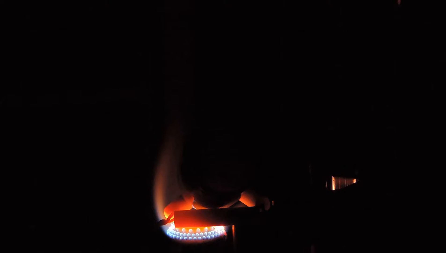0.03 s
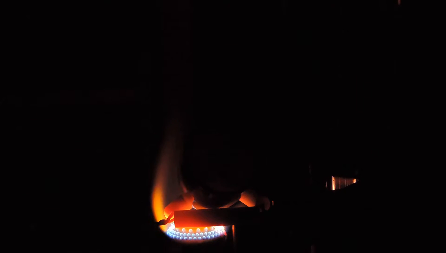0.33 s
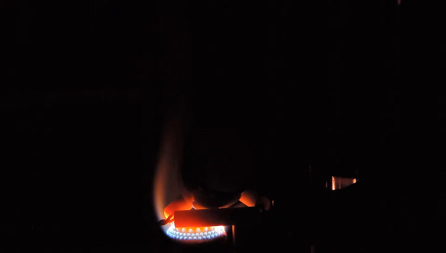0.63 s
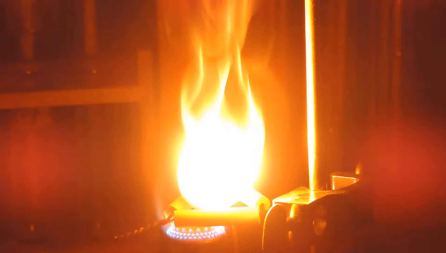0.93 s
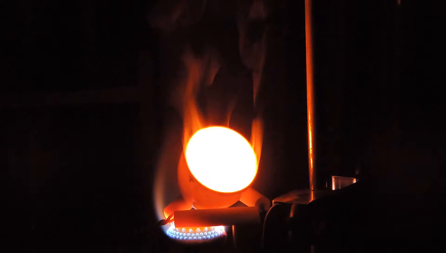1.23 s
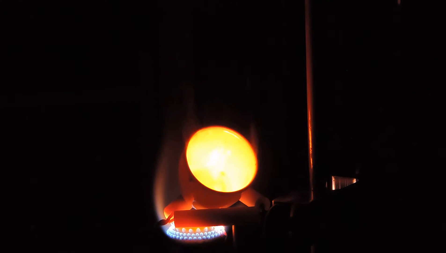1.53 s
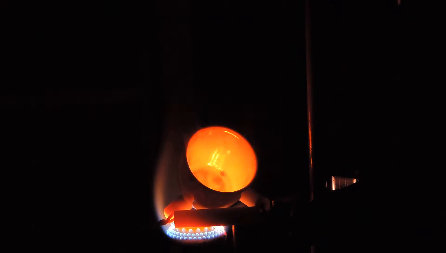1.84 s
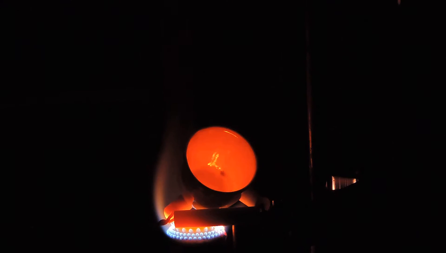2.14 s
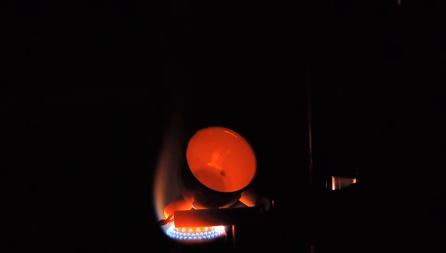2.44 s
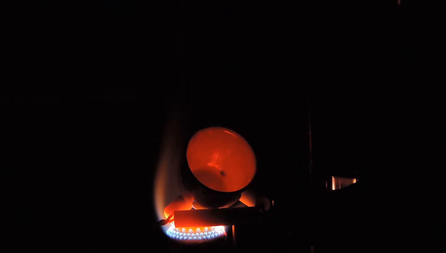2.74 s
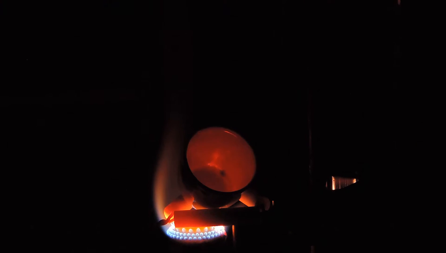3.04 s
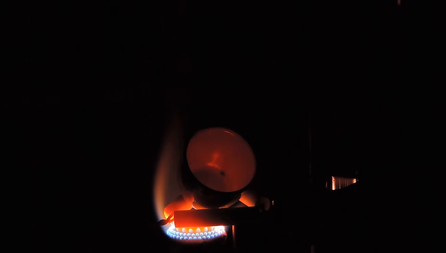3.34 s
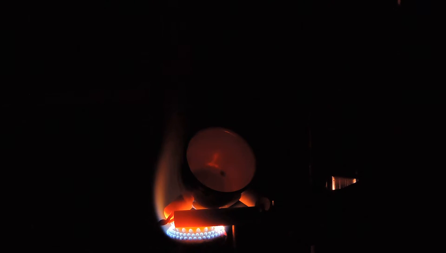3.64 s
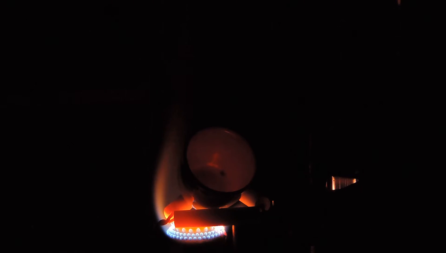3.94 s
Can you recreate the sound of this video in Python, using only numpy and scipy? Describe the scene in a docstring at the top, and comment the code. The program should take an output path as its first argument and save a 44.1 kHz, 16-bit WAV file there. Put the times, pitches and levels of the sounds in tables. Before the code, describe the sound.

A brief fiery flare hisses and crackles about a second in, cutting through the low roar of a gas burner in a fairly dead room. The microphone level ducks, then recovers, and the flame flutters on.

```python
"""Thermite flaring over a gas burner

A gas burner roars under a small crucible in a room, its flame fluttering and guttering over a hiss.
The thermite catches and flares for a third of a second: a bright jet of gas, full of crackle and a few
sharp spits, rings the crucible. A limiter ducks under the flare, holds, and lets the burner swell back."""
import sys
import numpy as np
from scipy import signal
from scipy.fft import rfft, irfft
from scipy.io import wavfile
from scipy.ndimage import uniform_filter1d, minimum_filter1d

SR = 44100
rng = np.random.default_rng(int(sys.argv[2]) if len(sys.argv) > 2 else 0)


def file_out(sig):
    """Save sig as 16-bit WAV at sys.argv[1]."""
    # one column per channel
    cols = np.atleast_2d(sig).T
    # limit, then scale
    lim = np.clip(cols, -1, 1)
    pcm = np.round(lim * 32767).astype(np.int16)
    wavfile.write(sys.argv[1], SR, pcm)


N = 176400
T = np.arange(N) / SR
HZ = np.maximum(np.arange(N // 2 + 1) * SR / N, 1)


def from_db(db):
    """Decibels to gain."""
    return 10 ** (np.asarray(db) / 20)


def eq_curve(points):
    """Gains that give unit white noise a spectrum of (frequency [Hz], density [dB/Hz]) points."""
    hz, db = np.transpose(points)
    return from_db(np.interp(np.log(HZ), np.log(hz), db)) * np.sqrt(SR / 2)


def bell(hz, width):
    """Gain of a resonance, 1 at its centre."""
    return 1 / (1 + 2 * ((HZ - hz) / width) ** 2)


def equalise(x, gain):
    """Minimum-phase EQ: rings after a transient, never before."""
    cepstrum = irfft(np.log(gain), N)
    cepstrum[1:N // 2] *= 2
    cepstrum[N // 2 + 1:] = 0
    return irfft(rfft(x) * np.exp(rfft(cepstrum)), N)


def noise(gain):
    """White noise shaped by a gain at each frequency."""
    return irfft(rfft(rng.standard_normal(N)) * gain, N)


def butterworth(x, hz, kind, order=2):
    """Low- or high-pass filter."""
    return signal.sosfilt(signal.butter(order, hz, kind, fs=SR, output="sos"), x)


def crossover(x, hz):
    """Low and high bands that add up to the whole."""
    low = irfft(rfft(x) / (1 + (HZ / hz) ** 6), N)
    return low, x - low


def stereo(mid, side):
    """Left and right: mid is shared, side is opposite in the two ears."""
    return np.array([mid + side, mid - side])


# Broad body of the roar, mid channel: (frequency [Hz], level [dB])
ROAR_MID = [(20, -80.5), (60, -85.5), (95, -87), (165, -80), (400, -84), (700, -86.5), (930, -87),
            (1300, -93.5), (1800, -92.5), (2400, -97.5), (3200, -106), (6000, -120)]
# Diffuse part of the roar, side channel: (frequency [Hz], level [dB])
ROAR_DIFFUSE = [(20, -89), (250, -94), (450, -88), (700, -101), (900, -95), (1350, -94.5), (1750, -93),
                (2500, -99), (3300, -106), (6000, -120)]
# Resonances of burner and room: (centre [Hz], width [Hz], mid level [dB], side level [dB])
BURNER_MODES = [(113, 8.5, -85, -104), (206, 40, -76.5, -100), (258, 32, -72, -99),
                (289.9, 23.2, -66, -102), (357, 25, -81, -95), (453, 29, -80.5, -92), (516, 36.3, -72, -87),
                (563, 27, -78.5, -126), (623, 20, -76, -83.5), (634.3, 51, -74.5, -84.5),
                (737, 31, -81, -94), (800, 29.5, -76.5, -84.5), (856, 16, -80, -83), (2020, 23, -89, -102)]
def burner():
    """Turbulence rings burner and room; the unsteady flame flutters the low roar more than the top."""
    flutter_hz, low_depth_db, high_depth_db, low_trim_db = 11, 1.02, 0.82, -1.2
    mid_power, side_power = eq_curve(ROAR_MID) ** 2, eq_curve(ROAR_DIFFUSE) ** 2
    for hz, width, mid_db, side_db in BURNER_MODES:
        peak = SR / 2 * bell(hz, width) ** 2
        mid_power += peak * from_db(mid_db) ** 2
        side_power += peak * from_db(side_db) ** 2
    roar = stereo(noise(np.sqrt(mid_power)), noise(np.sqrt(side_power)))
    low, high = crossover(roar, hz=630)
    flutter = noise(1 / (1 + (HZ / flutter_hz) ** 2))
    flutter /= flutter.std()
    return low * from_db(low_trim_db + low_depth_db * flutter) + high * from_db(high_depth_db * flutter)


# Even bed of hiss: (frequency [Hz], level [dB])
HISS_BED = [(1000, -108), (3500, -105), (5500, -104.5), (6500, -103.5), (8100, -103), (9000, -107),
            (10500, -107.5), (12300, -104.5), (15800, -107)]
def hiss():
    """Gas and microphone hiss, smooth and wide above the roar."""
    colour = eq_curve(HISS_BED)
    return stereo(mid=noise(colour), side=from_db(-2) * noise(colour))


# Puffs of the flame: (peak time [s], half-length [s], centre [Hz], width [Hz], level [dB])
FLAME_PUFFS = [(0.326, 0.007, 550, 200, -46), (0.432, 0.016, 278, 70, -45), (.532, 0.0044, 595, 400, -47),
               (0.955, 0.0095, 89, 70, -60), (0.997, 0.011, 99, 120, -50), (1.45, 0.018, 533, 59.3, -50.5),
               (1.685, 0.058, 285, 30.3, -45.5), (1.845, 0.01, 260, 81.4, -44),
               (2.349, 0.0061, 570, 300, -45), (2.368, 0.026, 288, 40, -46.5), (3.116, 0.021, 276, 50, -55),
               (3.254, 0.0094, 296, 126, -41.5), (3.293, .02, 61, 60, -52), (3.293, .012, 1400, 2300, -54),
               (3.638, 0.02, 287, 71, -46), (3.848, 0.0096, 950, 770, -48.5),
               (3.983, 0.021, 283, 49.6, -44.5)]
def gutters():
    """The flame gutters in short puffs, each swelling and dying in its own band."""
    out = np.zeros(N)
    for time, half_length, hz, width, db in FLAME_PUFFS:
        swell = np.exp(-((T - time) / half_length) ** 2)
        puff = swell * noise(bell(hz, width) ** 2)
        out += from_db(db) * puff * np.linalg.norm(swell) / np.linalg.norm(puff)
    return out


# Envelope of the reaction's vigour: (time [s], level [dB])
VIGOUR = [(.862, -44), (0.894, -11.5), (.935, -1.5), (.96, 1.5), (.982, 2.5), (1.003, 6.5), (1.026, 4),
          (1.045, 1.5), (1.11, 1.5), (1.14, -8), (1.17, -10), (1.21, -58)]
def burning():
    """A jet of escaping gas and dense crackle, both riding the vigour of the reaction."""
    jet_db, crackle_db, clicks_per_s, spread_db = -2, -3.5, 2500, 3
    sizes = from_db(spread_db * np.minimum(rng.exponential(1, N), 4))
    polarity = rng.choice([-1, 1], N)
    crackle = sizes * polarity * (rng.random(N) < clicks_per_s / SR)
    jet = rng.standard_normal(N)
    times, db = np.transpose(VIGOUR)
    envelope = from_db(np.interp(T, times, db, left=-120, right=-120))
    return envelope * (from_db(jet_db) * jet + from_db(crackle_db) * crackle / crackle.std())


# Spark transients, ahead of the flare's EQ: (time [s], energy [dB])
SPARKS = [(.9155, 22), (.9315, 22.5), (.9445, 20), (.9585, 22.5), (.9598, 22.5), (.989, 25.5), (1.017, 29),
          (1.0565, 25), (1.078, 25), (1.108, 17), (1.110, 28), (1.135, 14), (1.1547, 24.5)]
def spits():
    """Sparks spit out of the melt, each a tiny noise burst with a hard attack."""
    decay_s = 0.00067
    out, age = np.zeros(N), T[:SR // 200]
    for time, db in SPARKS:
        burst = rng.standard_normal(len(age)) * np.exp(-age / decay_s)
        start = int(time * SR)
        out[start:start + len(age)] += from_db(db) * burst / np.linalg.norm(burst)
    return out


def room(x):
    """The short, dark reverb of a small, fairly dead room, wet only."""
    t60_s, wet_db = 0.26, -12
    age = T[:SR // 2]
    tail = butterworth(rng.standard_normal(len(age)), hz=3500, kind="low") * from_db(-60 * age / t60_s)
    return from_db(wet_db) * signal.fftconvolve(x, tail / np.linalg.norm(tail))[:N]


# Tone of the flare, mid channel: (frequency [Hz], level [dB])
FLARE_EQ = [(50, -80), (110, -96), (200, -89), (600, -90), (1200, -90), (1650, -82.5), (2300, -83.5),
            (2850, -80.5), (3300, -75.5), (3700, -77), (4200, -77), (5500, -84), (7500, -86.5),
            (10500, -83), (13000, -76.5), (15800, -83.5)]
# Tone of its reflections, side channel: (frequency [Hz], level [dB])
REFLECTION_EQ = [(100, -102), (700, -112), (1100, -92), (1700, -81), (2300, -86), (3550, -79), (4500, -82),
                 (6900, -102), (8600, -90), (10800, -100), (13800, -80.5), (15800, -100)]
# Ring of the crucible: (centre [Hz], width [Hz], boost or cut [dB])
CRUCIBLE_MODES = [(2680, 30, 5.5), (2958, 30, 11), (3270, 68, 4), (3670, 35, 2), (3890, 31, 3.5),
                  (4480, 18, -7), (5540, 90, 4), (10100, 41, 8), (12300, 60, -2), (14300, 40, 8)]
def flare():
    """Burn and spits sound through the crucible into the room; the treble sinks as the charge burns out."""
    dull_from_s, dull_db_per_s = 0.86, 20.5
    direct = burning() + spits()
    reflected = burning() + from_db(-11) * spits()
    ring = from_db(sum(db * bell(hz, width) for hz, width, db in CRUCIBLE_MODES))
    mid = equalise(direct + room(direct), ring * eq_curve(FLARE_EQ))
    side = equalise(reflected + room(reflected), eq_curve(REFLECTION_EQ))
    body, treble = crossover(stereo(mid, side), hz=4500)
    return body + treble * from_db(-dull_db_per_s * np.maximum(T - dull_from_s, 0))


def scene():
    """The burner bed fades in and the flare bursts over it; the mix leans a touch to the right."""
    start_s, fade_s = 0.086, 0.015
    fade_in = np.clip((T - start_s) / fade_s, 0, 1)
    balance = from_db([[-.2], [.2]])
    return (burner() + gutters() + hiss() + flare()) * balance * fade_in


def limiter_gain(x):
    """Ducks at once when the treble passes the threshold, holds, then releases at a steady rate."""
    threshold_db, detect_s, hold_s, release_db_per_s = -37, 0.0063, 0.35, 16.5
    sidechain = butterworth(x, hz=2060, kind="high")
    power = uniform_filter1d(np.mean(sidechain ** 2, axis=0), int(detect_s * SR))
    target_db = np.minimum(threshold_db - 10 * np.log10(np.abs(power) + 1e-12), 0)
    hold = int(hold_s * SR)
    held_db = -minimum_filter1d(target_db, hold, origin=(hold - 1) // 2, mode="nearest")
    release_ramp = release_db_per_s * T
    duck_db = np.maximum.accumulate(held_db + release_ramp) - release_ramp
    return from_db(-butterworth(duck_db, hz=120, kind="low", order=1))


def record(dry):
    """The limiter ducks the mix, soft-clips its peaks and adds a soft thump; the very top is cut."""
    ceiling, dc_offset, dc_block_hz, cutoff_hz = .075, -0.049, 1.63, 15850
    gain = limiter_gain(dry)
    ducked = dry * gain
    rounded = ducked / (1 + (ducked / ceiling) ** 4) ** .25
    thump = dc_offset * (gain - 1)   # ducking shifts a steady offset at the limiter's input
    out = butterworth(rounded + thump, dc_block_hz, "high", order=1)
    return irfft(rfft(out) / (1 + (HZ / cutoff_hz) ** 300), N)


dry = scene()
out = record(dry)
file_out(out)
```